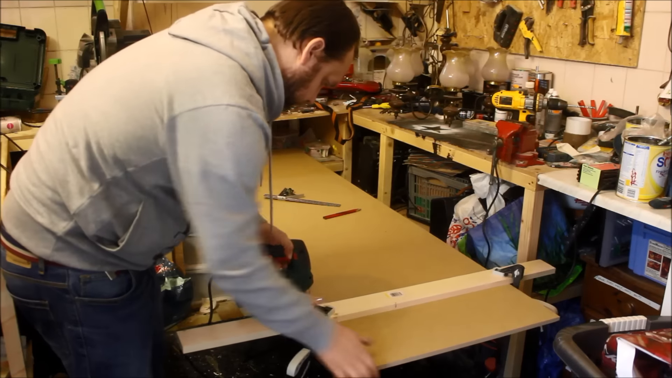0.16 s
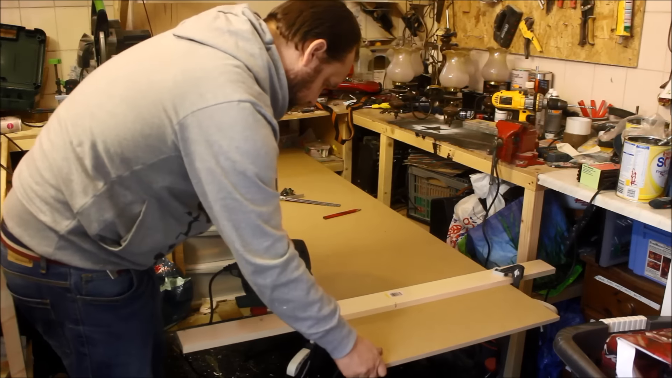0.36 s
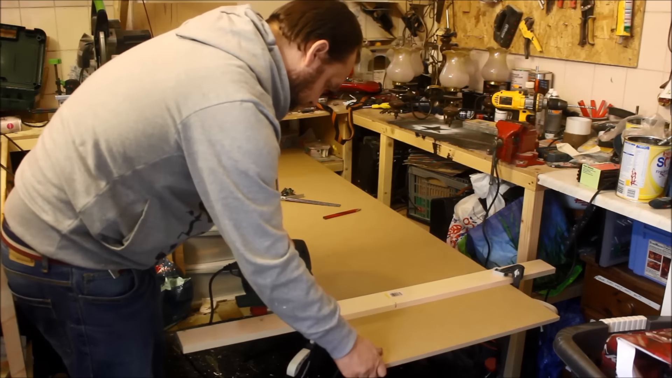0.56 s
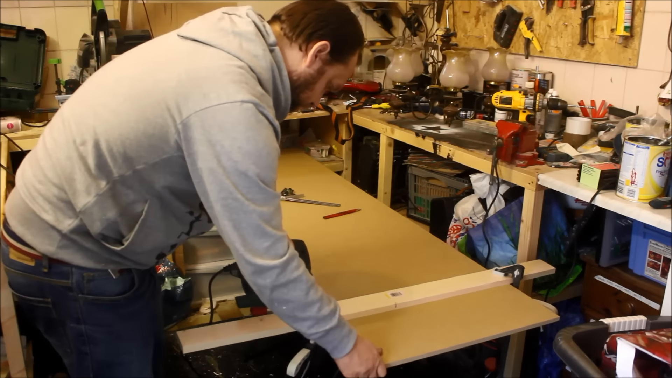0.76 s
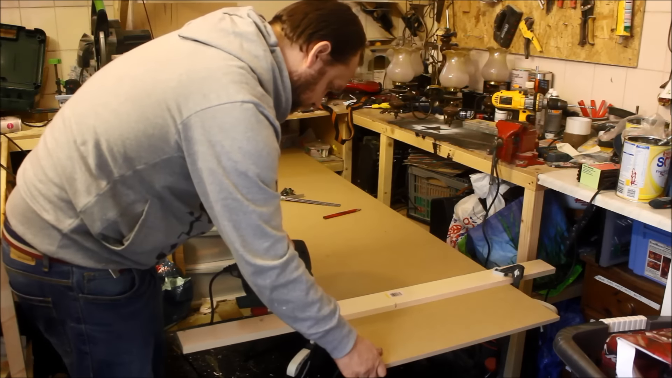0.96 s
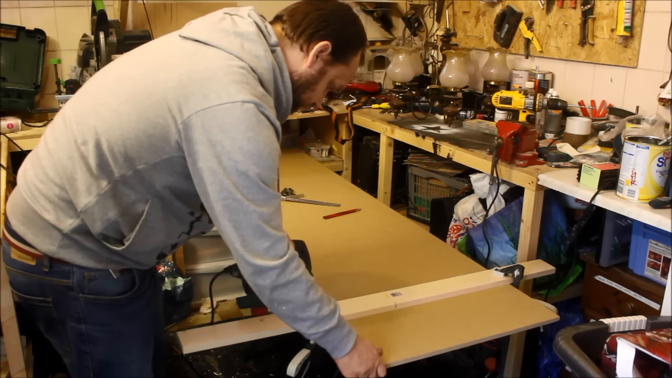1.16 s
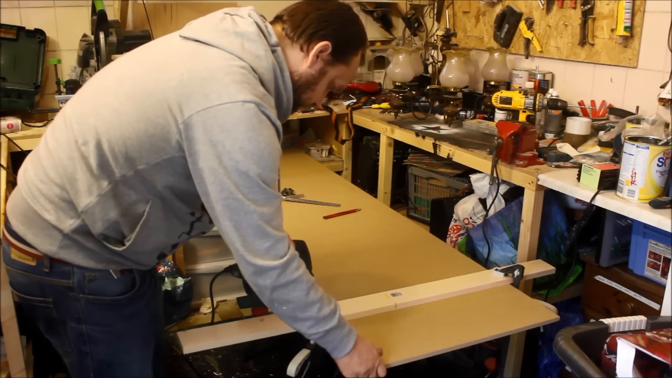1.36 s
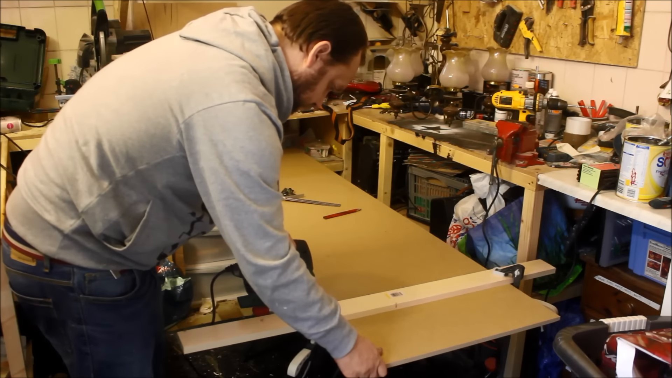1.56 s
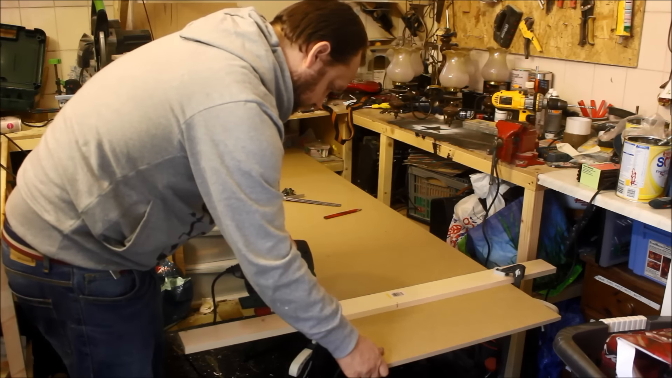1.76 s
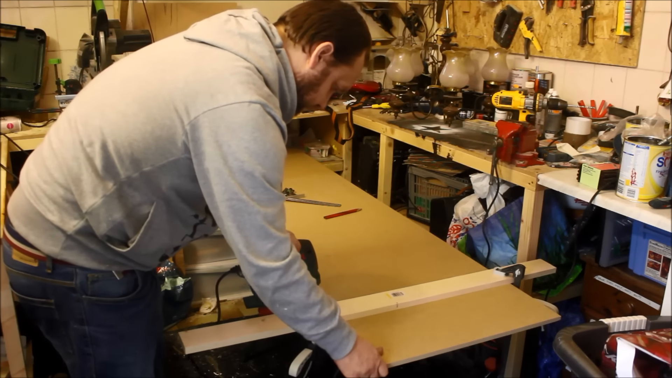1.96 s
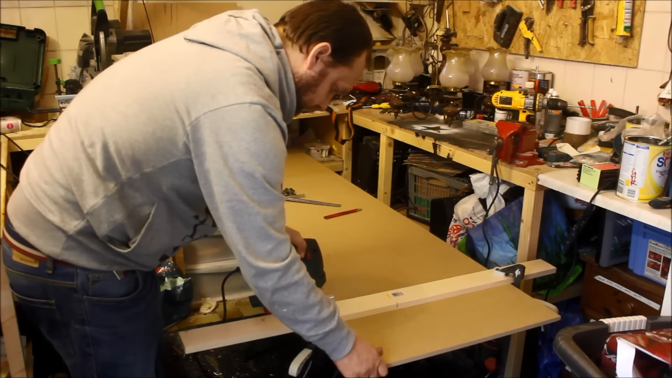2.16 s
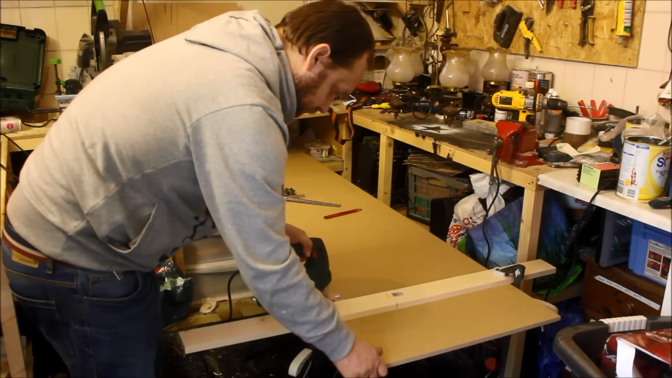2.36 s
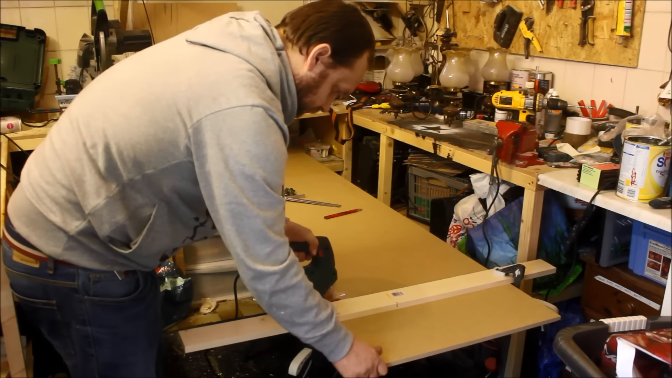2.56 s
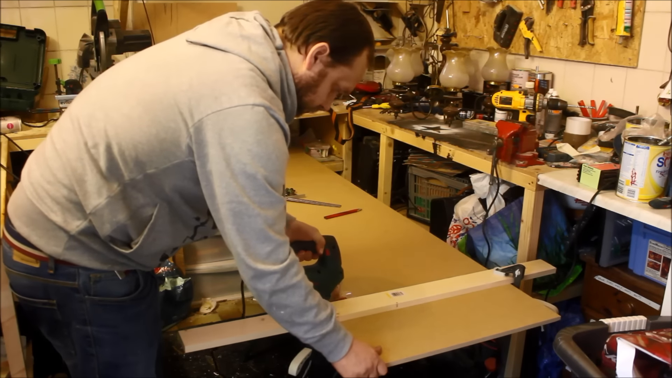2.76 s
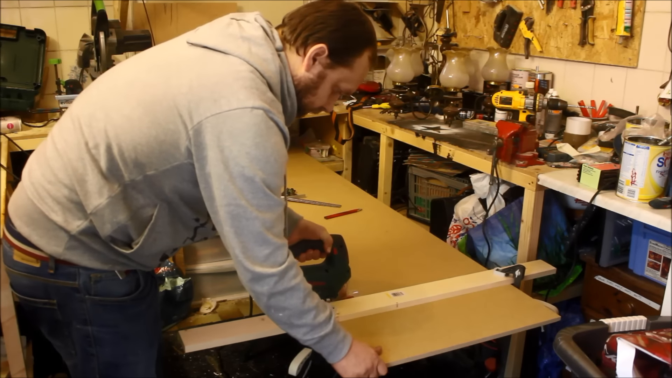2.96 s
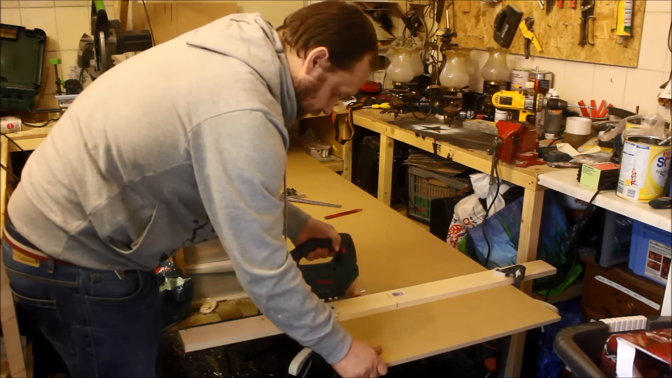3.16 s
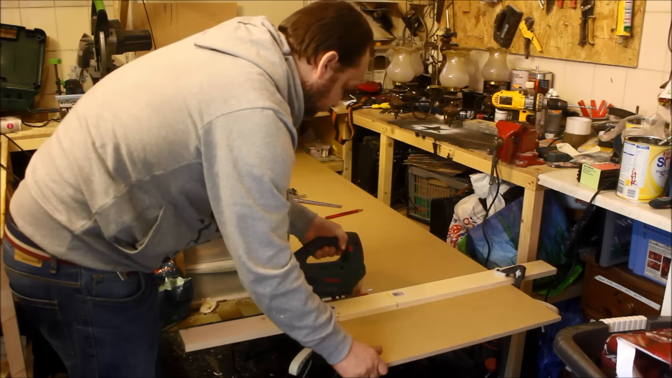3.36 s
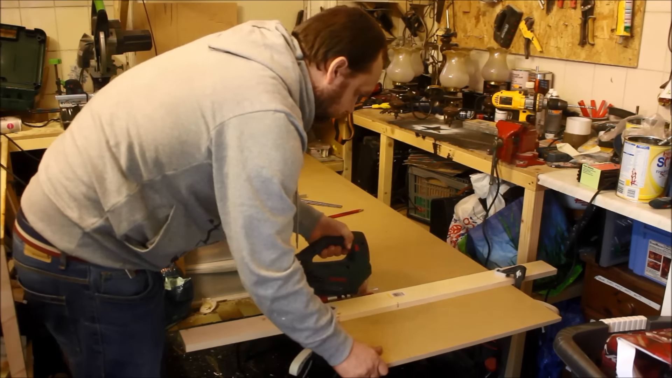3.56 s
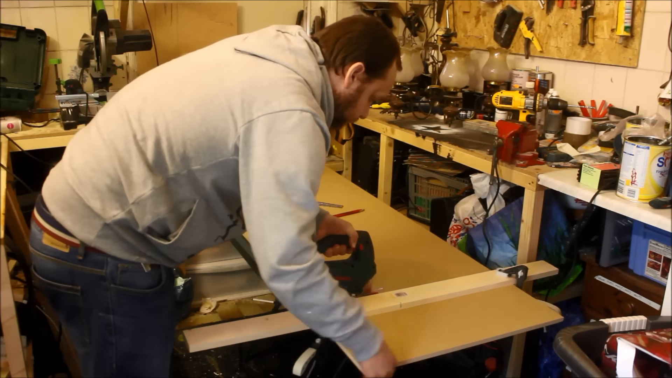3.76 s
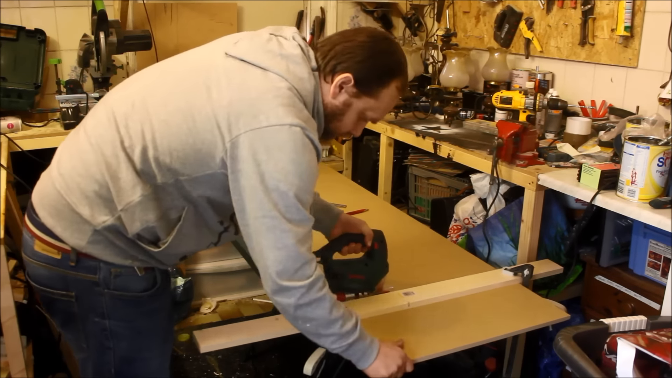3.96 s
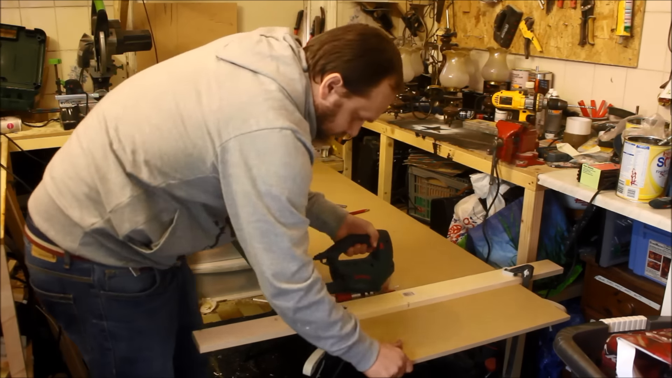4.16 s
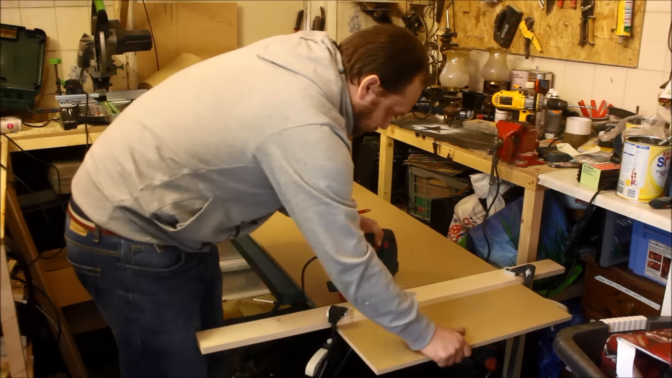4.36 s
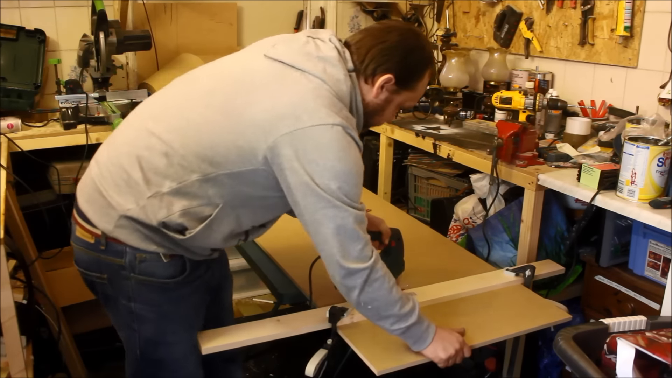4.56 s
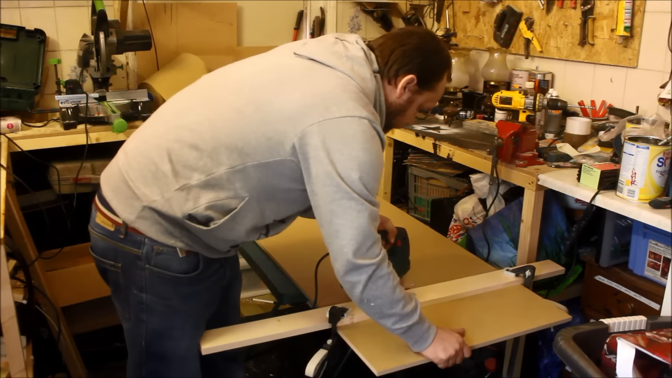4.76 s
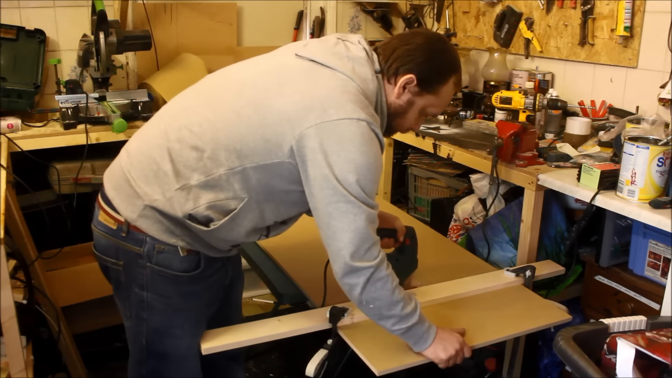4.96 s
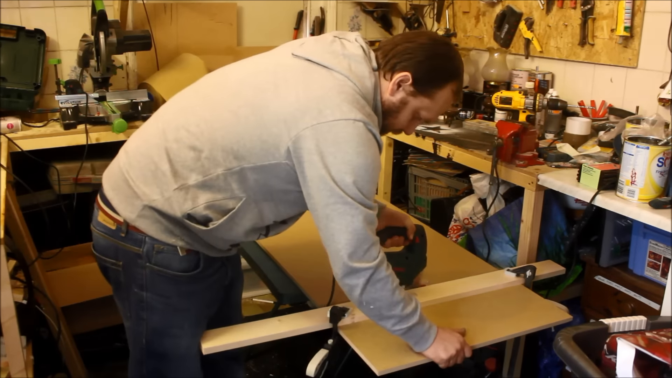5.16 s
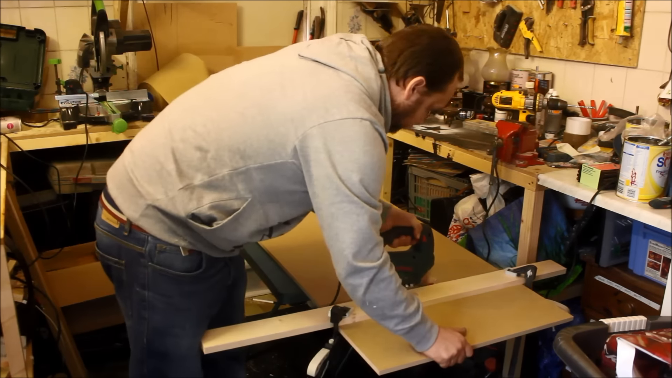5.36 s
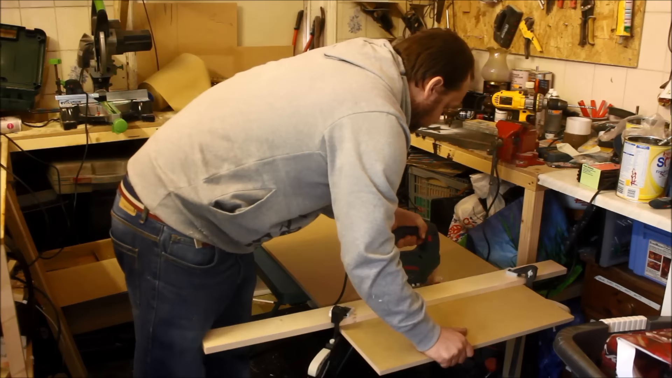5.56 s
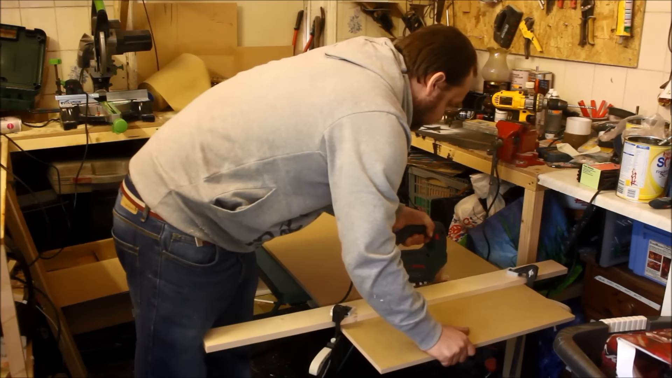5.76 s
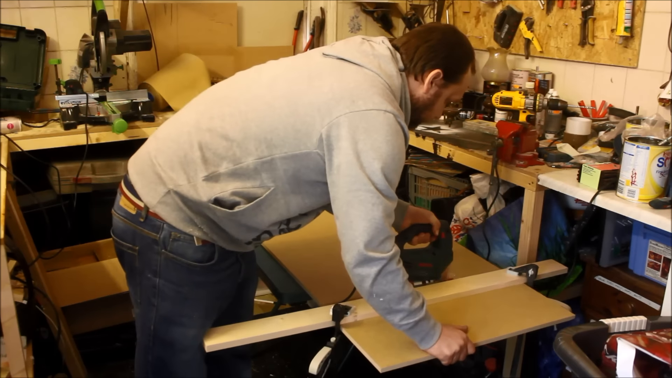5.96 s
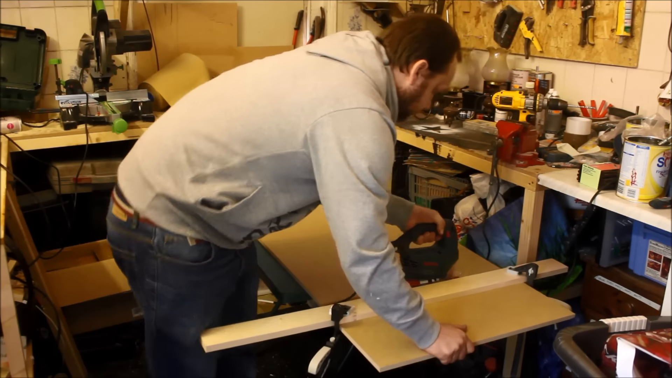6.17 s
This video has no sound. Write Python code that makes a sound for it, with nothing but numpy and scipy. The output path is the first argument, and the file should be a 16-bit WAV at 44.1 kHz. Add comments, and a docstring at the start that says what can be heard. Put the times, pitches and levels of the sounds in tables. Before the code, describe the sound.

A corded jigsaw is shoved onto a board, clicks and whirs up to a rattling run, then cuts abruptly to frantic, bright, sped-up sawing.

```python
"""A shoe scrapes as a corded jigsaw is shoved over a board; a trigger click, a hum, then a run-up to 47 strokes/s.
Clatter, cooling air and whistles are shaped noise and shaft-locked tones; the board then shakes at the stroke rate.
After an abrupt break the saw is in the board, at four times natural speed as in a time-lapse: bright noise of
the teeth, board tones and buzz at stroke harmonics, and a gear whine. The board's own rasp swells with depth.
Noise of the teeth and the run-up's airborne noise ring in a small workshop; hum, boom and rumble lie below."""
import sys
import numpy as np
from scipy import signal
from scipy.fft import rfft, irfft, next_fast_len
from scipy.io import wavfile

SR = 44100
rng = np.random.default_rng(int(sys.argv[2]) if len(sys.argv) > 2 else 0)


def materialize(psi):
    """Save the field psi as 16-bit PCM at rate SR to the path in sys.argv[1].

    A 1-D psi becomes a single channel; in a 2-D psi each row is a channel.
    """
    bounded = np.clip(np.atleast_2d(psi).T, -1, 1)
    quanta = np.round(bounded * 32767).astype(np.int16)
    wavfile.write(sys.argv[1], SR, quanta)


N = 273420   # samples

# Sawing: strokes as heard: [t/s, rate/(strokes per s)]
SAWING_SPEED = [(1.92, 185.7), (2.11, 186.1), (2.3, 184.4), (2.6, 186.4), (3.28, 186.3), (3.64, 188.4),
                (3.75, 190.7), (3.88, 187.8), (3.95, 190.1), (4.22, 186.9), (4.39, 192.6), (4.51, 185.3),
                (4.59, 187.4), (4.89, 187.8), (5.17, 185.9), (5.43, 185.7), (5.55, 187.7), (6.18, 187.2)]
# Push on the saw, as the level of the board's tones; it eases where the saw speeds up: [t/s, level/dB]
PUSH = [(1.9, -46), (2.85, -45.5), (3.55, -44.5), (3.9, -46.5), (4.0, -41.5), (4.24, -43), (4.36, -55),
        (4.44, -43.5), (4.6, -42.5), (5.3, -39), (6.2, -44)]
# Stroke harmonics the board radiates best, relative to the push; multiples are rounded in use:
# [multiple of stroke rate, level at the board's edge/dB, level deep in the cut/dB]
BOARD_TONES = [(1, -28.5, -10.5), (2, -14.5, -22), (3, -0.5, 0), (4, -15, -12.5), (5.06, -11, 6.5),
               (6, -5, -15), (7.14, -17.5, -7.5), (8, -11.5, -6), (11, -4, -7), (15.1, -7, 1.5),
               (16, 0.5, -21), (19, -25, 0), (21, -9, -1), (22.8, -17, 2)]
# Curve for the other stroke harmonics, relative to the bite: [multiple of stroke rate, level/dB]
BUZZ_CURVE = [(4, -21), (7, -23.5), (11, -9), (14, -16.5), (22, -11.5), (30, -12.5), (48, -17.5), (58, -9),
              (64, -14.5), (84, -30)]
# A stroke harmonic meets a resonance and sings out: [t/s, hold/s, multiple of stroke rate, level/dB]
SINGING = [(1.88, .27, 33, -36.5), (1.9, .25, 45, -35.5), (1.9, 0.25, 30, -43), (2.07, 0.56, 28, -41.5),
           (2.554, 1.05, 5, -49), (2.82, 0.62, 39, -40.5), (2.88, 0.52, 8, -49.5), (3.185, 0.45, 3, -41),
           (3.393, 0.43, 17, -42), (3.65, 0.72, 11, -46.5), (3.965, 0.16, 2, -57), (4.536, 0.74, 7, -45),
           (4.728, .19, 44, -40), (4.75, 0.38, 19, -45), (5.08, 0.33, 37, -41), (5.58, .49, 36, -39.5),
           (5.633, 0.88, 5, -37)]
# Gear whine while sawing, before its stroke-by-stroke loading: [t/s, level/dB]
GEAR_WHINE = [(1.9, -35.5), (2.8, -31.5), (3.5, -36), (4.15, -35), (4.6, -38.5), (6.2, -52)]
# Relative spectrum of the teeth: [f/Hz, level/dB per Hz]
TOOTH_SPECTRUM = [(60, -90), (200, -43), (700, -61), (1400, -34), (2000, -11.5), (3000, -0.5), (5200, 1.5),
                  (8200, 3), (11000, 2.5), (13500, 2), (16000, -0.5)]
# Relative spectrum of the board's own rasp: [f/Hz, level/dB per Hz]
BOARD_SPECTRUM = [(40, -80), (90, -48), (186, -15.5), (290, -29.5), (380, -10.5), (450, -18), (560, -7),
                  (700, -9.5), (900, -4), (1200, -3), (1400, -6), (1800, 0), (2600, -1.5), (4500, -12.5),
                  (9000, -43)]
# Run-up: relative spectrum of the plunger's rattle: [f/Hz, level/dB per Hz]
CLATTER_SPECTRUM = [(60, -50), (130, -27), (230, -22.5), (350, -20), (500, -10), (700, -6.5), (1100, -5),
                    (1900, -3), (2700, -2.5), (3800, -5), (5000, -9), (6500, -27), (9000, -22),
                    (16000, -55)]
# Relative spectrum of the cooling air: [f/Hz, level/dB per Hz]
AIR_SPECTRUM = [(3000, -26), (5000, 0), (7000, 0.5), (9500, -0.5), (11800, 2.5), (14000, 0.5), (16000, -3)]
# How well the housing radiates a gear tone gliding through it: [f/Hz, level/dB]
HOUSING = [(1100, -20), (1600, -6), (2000, 3), (2350, -5), (2600, 2.5), (2950, 5.5), (3600, -4), (4300, -4),
           (4900, 1.5), (5400, -4.5)]
# Stroke harmonics of the shaken board, relative to the shake: [multiple of stroke rate, level/dB]
SHAKE_TONES = [(2, -16.5), (3, -1), (5, -8), (6, -7), (11, -2.5), (13, -4), (25, 4), (28, 4), (33, 8),
               (36, 1), (45, 7.5), (52, -26), (55, 1), (56, -10), (58, -8), (59, -3), (60, 2)]
# Trigger and gear knocks, level before the low cut: [t/s, level/dB, low cut f/Hz]
KNOCKS = [(0.316, -31, 3500), (0.391, -49, 500), (0.547, -13, 900)]
# Shoe shoved over the board: [t/s, hold/s, scrape level/dB, boom level/dB]
SHOVES = [(0, 0.074, -38.5, -47.5), (0.225, 0.055, -53, -78), (0.38, 0.11, -43, -52.5)]
# Relative spectrum of the shoe on the board: [f/Hz, level/dB per Hz]
SCRAPE_SPECTRUM = [(59, -41), (100, -9), (210, -19), (383, -32), (517, -8), (571, -20), (657, -11),
                   (924, -18), (1270, -10.5), (12000, -35.5), (15600, -86), (22000, -120)]
# Relative spectrum of the handling rumble: [f/Hz, level/dB per Hz]
RUMBLE_SPECTRUM = [(20, -14), (38, -8), (58, -1), (110, -3), (300, 1), (1000, -21)]

BREAK_S, RESUME_S = 1.868, 1.901
LAPSE = 4   # times natural speed
TRIGGER_S, CREEP_S, FULL_POWER_S = [row[0] for row in KNOCKS]   # click, half pressed, fully pressed
CONTACT_S = 0.98   # the blade meets the board
MOTOR_TURNS = 28 / 3   # per stroke
PINION_TEETH, COMMUTATOR_BARS, FAN_BLADES = 6, 24, 30
TOP_RATE, SPIN_UP_S, SPIN_UP_LAG_S = 46.9, 0.448, 0.163   # strokes/s without load, start, time constant
SURGE_FADE_S = 0.53   # time constant of the extra run-up noise
RASP_DB, RASP_SAG_DB = -26, 1.2   # the teeth at the board's edge; their loss by the end of the cut
BITE_DB, BITE_GROWTH_DB = -40, 4   # reference at the edge; its gain by the end, not applied to the buzz
BITE_FOLLOWS, BUZZ_FOLLOWS = 0.45, 0.53   # shares of the push's swing in dB
SINGING_FADE_DB_PER_S = 70   # both in and out
SHAKE_DB, SHAKE_GROWTH_DB, SHAKE_SETTLE_S = -50.5, 7.5, 0.48
SHOVE_RISE_DB_PER_S, SHOVE_FALL_DB_PER_S, BOOM_FALL_DB_PER_S = 313, 258, 124
QUIET_SCRAPE_DB, QUIET_AIR_DB = -66, -76   # floors between the shoves
HUM_DB, HUM_FALL_DB_PER_S, HUM_HOLD_S = -58, 140, 0.24
RUMBLE_DB, RUMBLE_FALL_DB_PER_S = -57, 7
ROOM_T60_S = 0.46
CUTOFF_HZ = 15850


def sawing(t):
    """The blade in the board, with rates raised and the room's echo shortened by the time-lapse."""
    rate, = in_time(SAWING_SPEED, t)
    push_db, = in_time(PUSH, t)
    depth = np.linspace(0, 1, len(t))   # share of the cut that is done
    swing_db = push_db - push_db.mean()
    bite_db = BITE_DB + BITE_GROWTH_DB * depth + BITE_FOLLOWS * swing_db
    buzz_db = BITE_DB + BUZZ_FOLLOWS * swing_db + 1.5
    strokes = np.cumsum(rate * (1 + 0.00064 * drift(t, 28.4))) / SR
    turns = strokes * MOTOR_TURNS
    cutting = tooth_rasp(t, strokes, depth) + board_rasp(strokes, bite_db)
    tones = board_tones(t, strokes, depth, push_db, wander_db=0.53)
    harmonics = buzz(t, strokes, depth, buzz_db, even_loss_db=2.5, wander_db=3.6)
    motor = loaded_armature(t, strokes, turns, bite_db) + loaded_gears(t, strokes, turns, depth)
    return cutting + tones + harmonics + motor


def tooth_rasp(t, strokes, depth):
    """Teeth tear the wood: bright friction noise in the room, slightly duller in level with depth."""
    teeth = stroke_noise(strokes, depth_db=1.5, return_db=0.5, uneven_db=1.63)
    in_room = workshop(teeth, ROOM_T60_S / LAPSE, wet_db=-2.5)
    level_db = RASP_DB - RASP_SAG_DB * depth + 0.5 * drift(t, 1.7)
    return from_db(level_db) * coloured(in_room, TOOTH_SPECTRUM)


def board_rasp(strokes, bite_db):
    """A harder bite makes the board itself rasp, a quarter stroke away from the teeth."""
    friction = stroke_noise(strokes + 1 / 4, depth_db=2.0, return_db=-0.5, uneven_db=1.5)
    return from_db(bite_db - 6.0) * coloured(friction, BOARD_SPECTRUM)


def board_tones(t, strokes, depth, push_db, wander_db):
    """Strong stroke harmonics follow the push; their balance shifts as the blade goes deeper."""
    out = np.zeros(len(t))
    for k, edge_db, deep_db in BOARD_TONES:
        balance_db = edge_db + (deep_db - edge_db) * depth
        gain = from_db(push_db + balance_db + wander_db * np.sqrt(k) * drift(t, 1.45))
        tone = whine(t, strokes + rng.random(), round(k), 0, flutter=0.04 * np.sqrt(k), flutter_hz=11)
        out += np.hypot(gain, singing(t, round(k))) * tone
    return out


def buzz(t, strokes, depth, level_db, even_loss_db, wander_db):
    """The other stroke harmonics, each wandering in level; the even ones recede as the cut deepens."""
    out = np.zeros(len(t))
    for k in np.setdiff1d(np.arange(1, 85), [round(row[0]) for row in BOARD_TONES]):
        even_db = even_loss_db * depth * (k % 2 - 1.0)   # zero for odd multiples
        gain = from_db(level_db + on_log(BUZZ_CURVE, k) + even_db + wander_db * drift(t, 2.26))
        tone = whine(t, strokes + rng.random(), k, 0, flutter=0.046 * np.sqrt(k), flutter_hz=10)
        out += np.hypot(gain, singing(t, k)) * tone
    return out


def singing(t, k):
    """The extra gain of one stroke harmonic while it meets a resonance."""
    return sum(from_db(db) * held(t, s, length, SINGING_FADE_DB_PER_S, SINGING_FADE_DB_PER_S)
               for s, length, multiple, db in SINGING if round(multiple) == k)


def loaded_armature(t, strokes, turns, bite_db):
    """Shaft tones; each stroke loads the armature and puts a tone on either side of its own."""
    shaft = whine(t, turns, 0.99, -50, flutter=0.16, flutter_hz=40)
    octave = whine(t, turns, 2, -66, flutter=0.25, flutter_hz=18)
    upper = whine(t, turns + strokes, 1, bite_db - 15, flutter=0.22)
    lower = whine(t, turns - strokes, 1, bite_db - 21.0, flutter=0.33)
    return shaft + octave + upper + lower


def loaded_gears(t, strokes, turns, depth):
    """Pinion whine, loaded on every half stroke and growing unsteady as the cut goes on."""
    level_db, = in_time(GEAR_WHINE, t)
    unsteady_db = 4 * depth * drift(t, 10)
    mesh = whine(t, turns, PINION_TEETH, level_db + unsteady_db, flutter=0.55, flutter_hz=25)
    return mesh * (1 + 0.54 * np.cos(4 * np.pi * strokes))


def starting(t):
    """The saw slides into place and spins up: dry board and armature, everything airborne in the room."""
    rate = spin_up(t)
    speed_db = 20 * np.log10(rate / TOP_RATE)
    strokes = np.cumsum(rate) / SR
    turns = strokes * MOTOR_TURNS
    airflow = powered(t, creep_db=-61, swell_db=29.5, run_db=-27.5, surge_db=3.5)
    motor = gliding_gears(t, rate, turns) + whistles(t, turns, speed_db, airflow)
    rattling = shoe_scrape(t) + plunger_clatter(t, strokes) + knocks(t, t60=0.011)
    airborne = rattling + cooling_air(t, airflow) + motor
    armature = whine(t, turns, 0.99, -48.0 + 2.0 * speed_db, flutter=0.6)
    return board_shake(t, strokes) + armature + workshop(airborne, ROOM_T60_S, wet_db=-5.0)


def spin_up(t):
    """Strokes a second: a crawl, an exponential run-up, then a slight late sag."""
    free = TOP_RATE * (1 - np.exp(-(t - SPIN_UP_S) / SPIN_UP_LAG_S))
    return np.maximum(free, 3) - np.interp(t, [1.35, 1.87], [0, 0.5])


def powered(t, creep_db, swell_db, run_db, surge_db):
    """Gain of a motor noise: it swells on the half-pressed trigger, changes at full power, then settles."""
    creeping = creep_db + swell_db * (t - CREEP_S) / (FULL_POWER_S - CREEP_S)
    running = run_db + surge_db * np.exp(-(t - FULL_POWER_S) / SURGE_FADE_S)
    return (t >= CREEP_S) * from_db(np.where(t < FULL_POWER_S, creeping, running))


def plunger_clatter(t, strokes):
    """The plunger rattles: noise whose strength jumps with every half stroke."""
    rattle = stroke_noise(strokes, depth_db=0.0, return_db=0.0, uneven_db=1.2)
    gain = powered(t, creep_db=-38, swell_db=12, run_db=-25.5, surge_db=1.5)
    return gain * coloured(rattle, CLATTER_SPECTRUM)


def cooling_air(t, airflow):
    """Turbulent hiss of the cooling air, with a short ring at the trigger click and a faint floor."""
    trigger_ring = from_db(-53) * held(t, TRIGGER_S, 0, 5000, 200)
    return (airflow + trigger_ring + from_db(QUIET_AIR_DB)) * coloured(noise(t), AIR_SPECTRUM)


def gliding_gears(t, rate, turns):
    """Gear tones peak as full power comes on, and flare at the housing's resonances."""
    mesh_hz = rate * MOTOR_TURNS * PINION_TEETH
    mesh_db = on_log(HOUSING, mesh_hz) + 3 * drift(t, 7.3)
    mesh = whine(t, turns, PINION_TEETH, mesh_db, flutter=0.56)
    overtone_db = on_log(HOUSING, 2 * mesh_hz) + 3 * drift(t, 12)
    overtone = whine(t, turns, 2 * PINION_TEETH, overtone_db, flutter=2.5)
    mesh_gain = powered(t, creep_db=-75, swell_db=28, run_db=-38, surge_db=10.5)
    overtone_gain = powered(t, creep_db=-78, swell_db=26, run_db=-40.5, surge_db=11)
    return mesh_gain * mesh + overtone_gain * overtone


def whistles(t, turns, speed_db, airflow):
    """Commutator bars and fan blades whistle at their passing rates, coming up with speed."""
    commutator = whine(t, turns, COMMUTATOR_BARS, 1.7 * speed_db - 9.0, flutter=1.7)
    fan = whine(t, turns, FAN_BLADES, 1.9 * speed_db - 10.0, flutter=1.8)
    return airflow * (commutator + fan)


def board_shake(t, strokes):
    """The board throbs at stroke harmonics, harder as the blade enters it."""
    entered = 1 - np.exp(-np.maximum(t - CONTACT_S, 0) / SHAKE_SETTLE_S)
    shake = from_db(SHAKE_DB + SHAKE_GROWTH_DB * entered) * held(t, CONTACT_S, 0, 200, 0)
    tones = sum(whine(t, strokes, round(k), db, flutter=0.078 * np.sqrt(k), flutter_hz=11.0)
                for k, db in SHAKE_TONES)
    return shake * tones


def knocks(t, t60):
    """Short cracks of the trigger and of the gears taking up their slack: decaying noise, lows cut."""
    out = np.zeros(len(t))
    for s, level_db, low_hz in KNOCKS:
        decay_db = -60 * np.clip(t - s, 0, 1) / t60
        crack = noise(t) * (t >= s) * from_db(level_db + decay_db)
        out += signal.sosfilt(signal.butter(2, low_hz, "high", fs=SR, output="sos"), crack)
    return out


def shoe_scrape(t):
    """The shoe rubs over the board: friction noise swelling at each shove."""
    shoving = sum(from_db(db) * held(t, s, length, SHOVE_RISE_DB_PER_S, SHOVE_FALL_DB_PER_S)
                  for s, length, db, _ in SHOVES)
    return np.hypot(shoving, from_db(QUIET_SCRAPE_DB)) * coloured(noise(t), SCRAPE_SPECTRUM)


def board_boom(t):
    """The board booms under the shoe: noise through two neighbouring resonances."""
    booming = sum(from_db(db) * held(t, s, length, SHOVE_RISE_DB_PER_S, BOOM_FALL_DB_PER_S)
                  for s, length, _, db in SHOVES)
    return booming * resonance(resonance(noise(t), 210, 30), 207, 45)


def mains_hum(t):
    """The labouring motor hums at 100 Hz as the trigger is half pressed."""
    return from_db(HUM_DB) * held(t, CREEP_S, HUM_HOLD_S, 480, HUM_FALL_DB_PER_S) * whine(t, t, 100, 0, flutter=0.3)


def handling_rumble(t):
    """Handling sends a low rumble of noise that steadily fades."""
    return from_db(RUMBLE_DB - RUMBLE_FALL_DB_PER_S * t) * coloured(noise(t), RUMBLE_SPECTRUM)


def workshop(x, t60, wet_db):
    """Direct sound plus dense dying reflections from benches and walls; the power is kept."""
    age = np.arange(SR // 2) / SR
    tail = rms_one(noise(age) * from_db(-60 * age / t60)) / np.sqrt(len(age))
    response = from_db(wet_db) * tail
    response[0] = 1
    return signal.fftconvolve(x, response / np.linalg.norm(response))[:len(x)]


def stroke_noise(strokes, depth_db, return_db, uneven_db):
    """Friction noise that can swell on each half stroke, unequal up and down, no two alike."""
    half = (2 * strokes).astype(int)
    strength_db = uneven_db * rng.standard_normal(N // 10)[half] + return_db * (half % 2)
    swell_db = -depth_db * np.cos(4 * np.pi * strokes)
    return noise(strokes) * from_db(strength_db + swell_db)


def whine(t, turns, multiple, level_db, flutter, flutter_hz=70):
    """A sine at a multiple of a rotation or stroke rate, its phase shaken by flutter in radians."""
    phase = 2 * np.pi * multiple * turns + flutter * drift(t, flutter_hz)
    return np.sqrt(2) * from_db(level_db) * np.sin(phase)


def held(t, start, length, rise_db_per_s, fall_db_per_s):
    """Attack before the start, hold and release, as a gain."""
    rise_db = -rise_db_per_s * np.maximum(start - t, 0)
    fall_db = -fall_db_per_s * np.maximum(t - start - length, 0)
    return from_db(rise_db + fall_db)


def drift(t, rate):
    """Smooth chance of spread 1 that changes about rate times a second, drawn every 40 samples."""
    r = np.exp(-80 * np.pi * rate / SR)
    draws = rng.standard_normal(len(t) // 40 + 2002)
    slow = signal.lfilter([1], [1, -2 * r, r * r], draws)[2000:]   # skip the filter's settling
    return np.interp(np.arange(len(t)) / 40, np.arange(len(slow)), rms_one(slow))


def coloured(x, spectrum):
    """Give a sound a spectrum; unit power."""
    size = next_fast_len(len(x) + SR // 10)
    gain = from_db(on_log(spectrum, np.fft.rfftfreq(size, 1 / SR)))
    return rms_one(irfft(rfft(x, size) * gain, size)[:len(x)])


def resonance(x, hz, width_hz):
    """One two-pole resonance; unit power."""
    r = np.exp(-np.pi * width_hz / SR)
    poles = [1, -2 * r * np.cos(2 * np.pi * hz / SR), r * r]
    return rms_one(signal.lfilter([1, 0, -1], poles, x))


def noise(t):
    """White noise as long as t."""
    return rng.standard_normal(len(t))


def from_db(db):
    """Decibels to gain."""
    return 10 ** (np.asarray(db) / 20)


def rms_one(x):
    """Scale to unit power."""
    return x / np.sqrt(np.mean(np.abs(x) ** 2) + 1e-20)


def in_time(rows, t):
    """The columns of a curve at the times t."""
    s, *columns = np.transpose(rows)
    return [np.interp(t, s, c) for c in columns]


def on_log(points, at):
    """Read a curve along a logarithmic axis."""
    x, level_db = np.transpose(points)
    return np.interp(np.log(at + 1e-3), np.log(x), level_db)


def scene():
    """Spin-up, a brief break in which a trace of it dies away, then fast sawing; the same in both ears."""
    t = np.arange(N) / SR
    early, late = t[t < RESUME_S], t[t >= RESUME_S]
    fade_out = from_db(np.interp(early - BREAK_S, [-0.002, 0.001, 0.012, 0.02], [0, -16, -24, -42]))
    fade_in = np.clip((late - RESUME_S) / 0.002, 0, 1)
    low_sounds = mains_hum(early) + board_boom(early) + handling_rumble(early)
    sound = np.concatenate([fade_out * (starting(early) + low_sounds), fade_in * sawing(late)])
    return np.array([sound, sound])


def record(dry):
    """An elliptic low-pass cuts the top steeply."""
    return signal.sosfilt(signal.ellip(12, 0.1, 80, CUTOFF_HZ, fs=SR, output="sos"), dry)


dry = scene()
out = record(dry)
materialize(out)
```